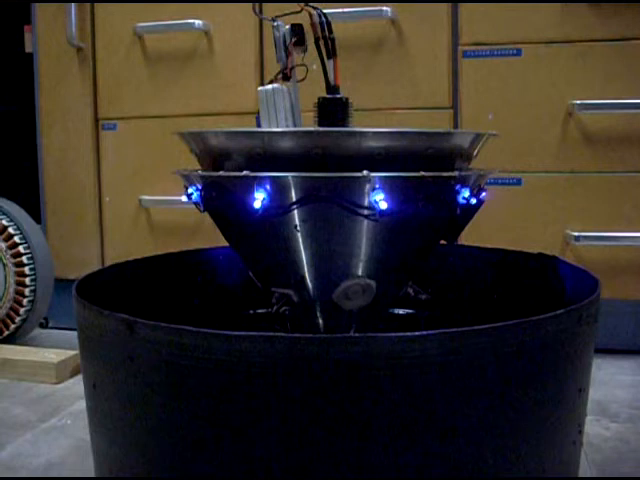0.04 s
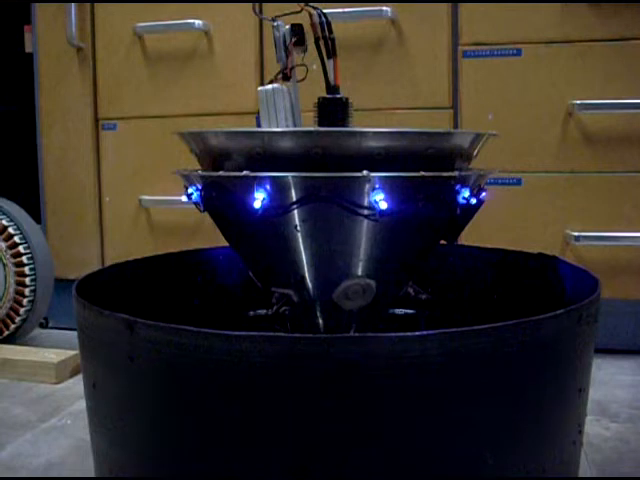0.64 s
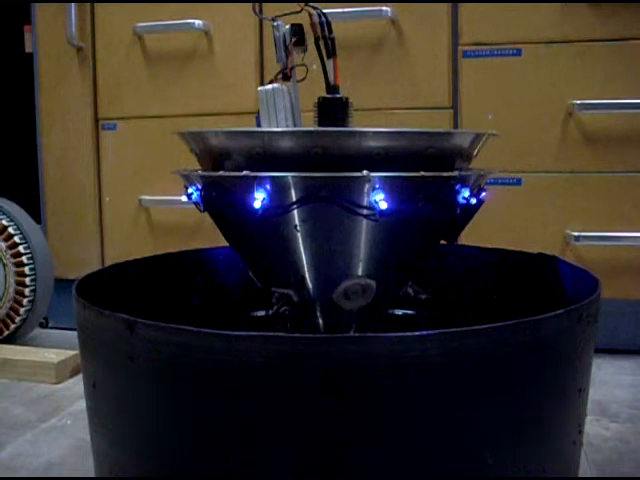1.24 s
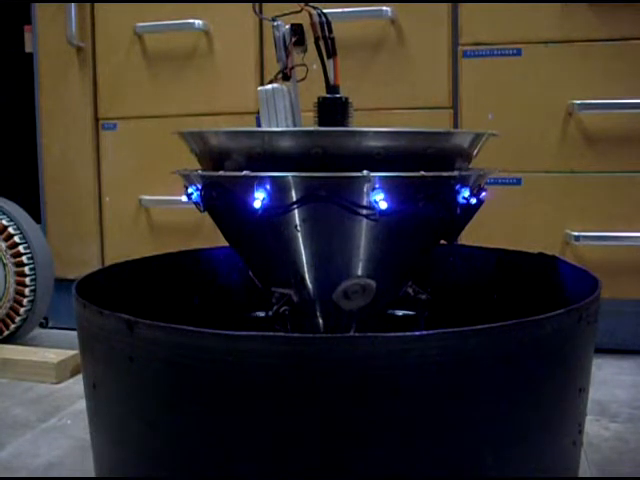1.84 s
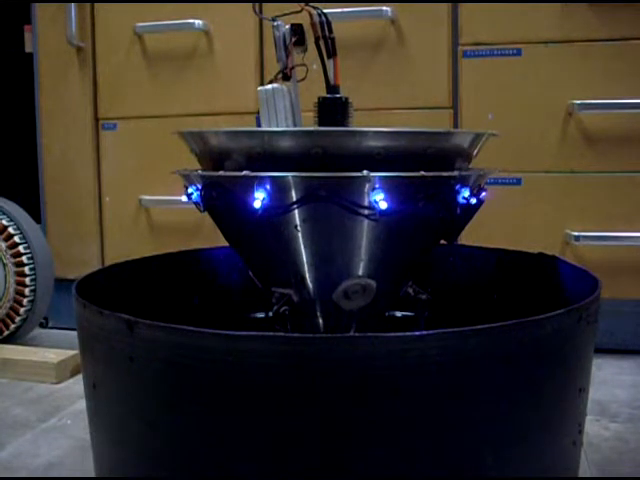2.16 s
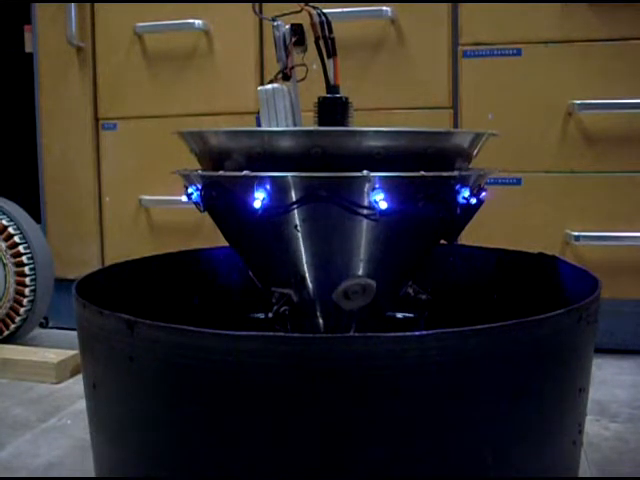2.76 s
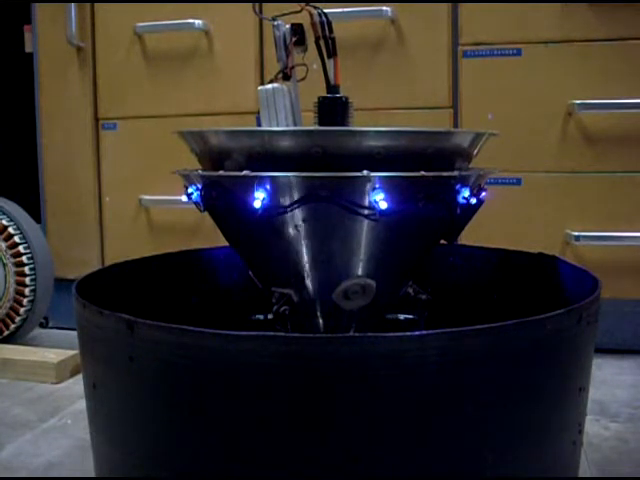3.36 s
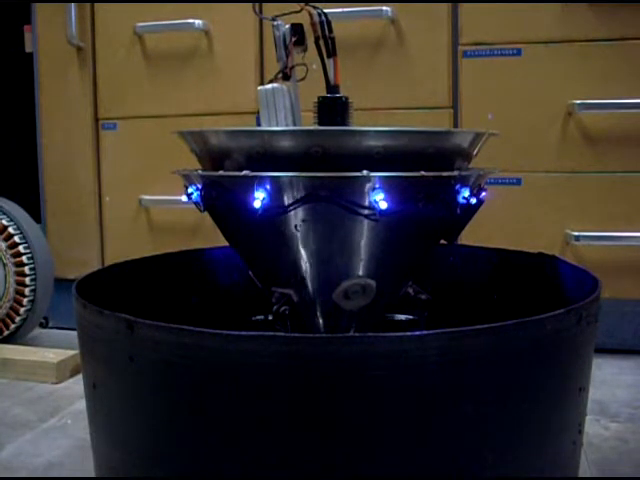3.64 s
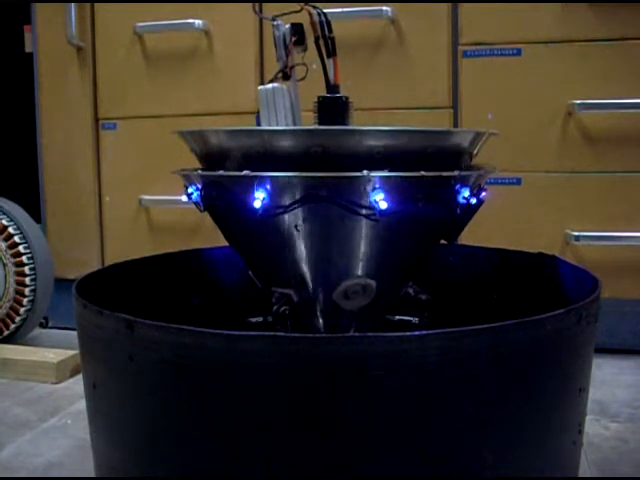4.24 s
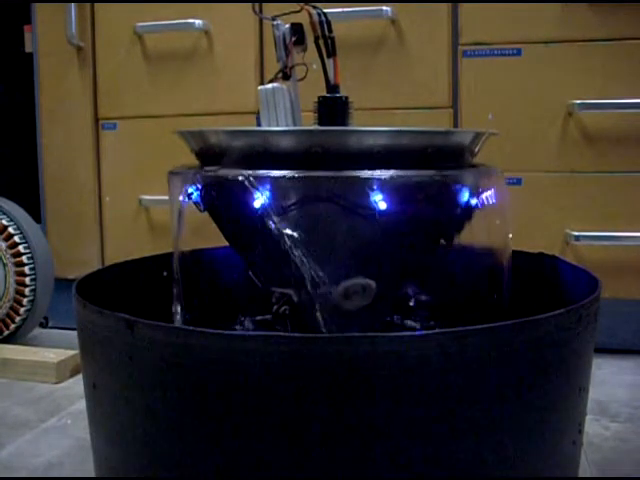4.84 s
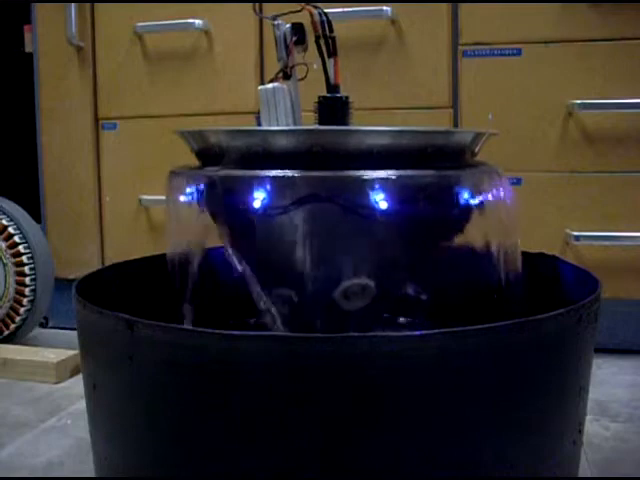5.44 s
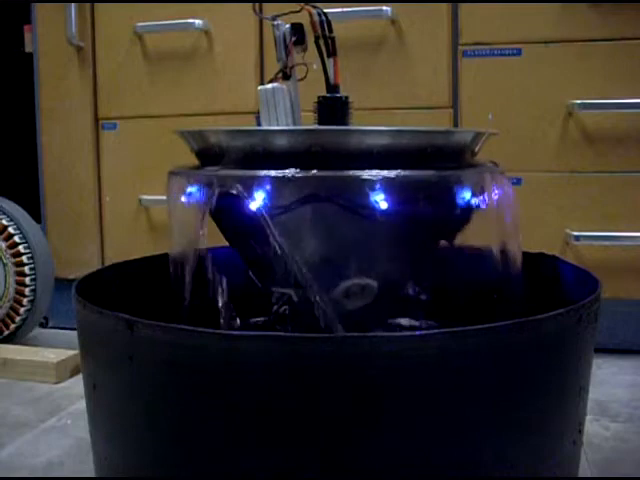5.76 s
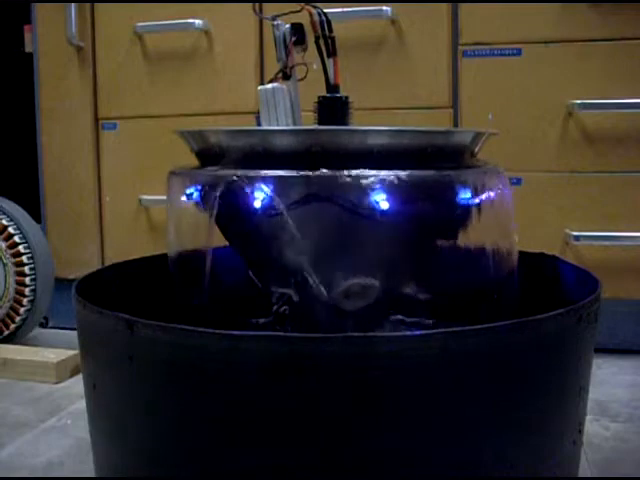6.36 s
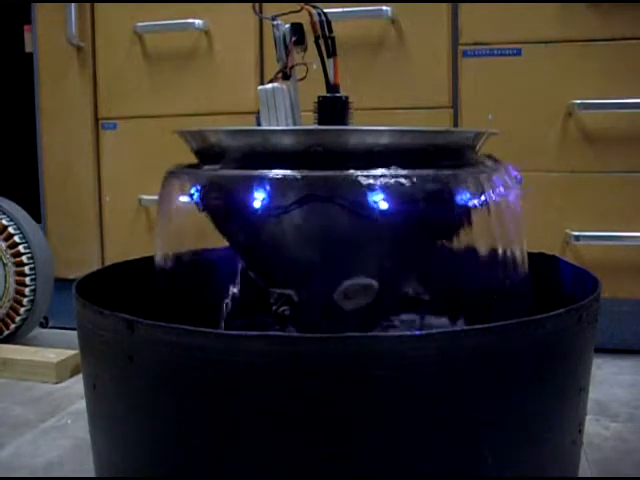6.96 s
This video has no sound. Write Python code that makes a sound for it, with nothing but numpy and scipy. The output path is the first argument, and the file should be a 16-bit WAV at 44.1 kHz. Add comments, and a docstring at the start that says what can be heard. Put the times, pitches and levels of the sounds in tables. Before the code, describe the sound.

A small electric pump speeds up with a thin, high whine. Water churns and hisses inside its metal cone, growing louder over a hollow hum. Past halfway the water spills over and splashes unevenly into a plastic tub, with gargling and a few loud gulps. Near the end the flooded pump drones in wavering tones that jump in pitch. It sounds close, with a short workshop echo.

```python
"""A cone pump overflowing in a tub

A small electric motor spins up a cone pump standing in a plastic tub, in a workshop.
Its controller whines; water churns and climbs the cone, and the air in the bowl hums ever louder.
Then the water spills over the rim and splashes into the tub while the flooded rotor drones."""
import sys
import numpy as np
from scipy import signal
from scipy.fft import rfft, irfft, next_fast_len
from scipy.io import wavfile
from scipy.ndimage import map_coordinates

SR = 44100
rng = np.random.default_rng(int(sys.argv[2]) if len(sys.argv) > 2 else 0)


def int16_out(signal):
    """Quantize to a 16-bit WAV file."""
    q = np.round(np.clip(np.atleast_2d(signal).T, -1, 1) * 32767)
    wavfile.write(sys.argv[1], SR, q.astype(np.int16))


N = 312669

# motor speed, as how often the current steps from coil to coil: time_s, rate_hz
MOTOR_SPEED = [(0, 158), (.5, 179), (1, 206), (1.5, 226.7), (2.5, 259.4), (3.1, 278), (4, 298), (4.6, 335),
               (5.5, 358), (5.9, 361), (6.1, 427), (6.35, 430), (6.7, 419), (7.09, 403)]


def amp(db):
    """Turn decibels into a gain."""
    return 10 ** (np.asarray(db) / 20)


def unit(x):
    """Scale a signal to an average (rms) level of 1."""
    return x / np.sqrt(np.mean(np.abs(x) ** 2) + 1e-20)


def along(points, hz):
    """Read between rows of (pitch_hz, value) on a musical (log) scale."""
    pitches, values = np.transpose(points)
    return np.interp(np.log(hz + 1), np.log(pitches + 1), values)


def curves(rows):
    """Turn each column after time_s into one value per sample."""
    times, *columns = np.transpose(rows)
    return [np.interp(np.arange(N) / SR, times, column) for column in columns]


def wobble(rate):
    """A smooth curve through `rate` random values a second."""
    return map_coordinates(rng.standard_normal(int(N * rate / SR) + 4), [np.arange(N) * rate / SR])


def swell(start, end, fade_s):
    """Fade from 0 toward 1 around start, and back around end."""
    t = np.arange(N) / SR
    return np.clip(np.minimum(t - start, end - t) / fade_s + .5, 0, 1)


def swells(rows, fade_s):
    """Add up one swell per row of (start_s, end_s, size)."""
    return sum(size * swell(start, end, fade_s) for start, end, size in rows)


def filtered(x, response):
    """Scale each frequency in x by response(hz)."""
    size = next_fast_len(N + SR // 2)
    return irfft(rfft(x, size) * response(np.fft.rfftfreq(size, 1 / SR)), size)[:N]


def coloured(x, spectrum):
    """Shape x by rows of (pitch_hz, level_db), then scale it to level 1."""
    return unit(filtered(x, lambda hz: amp(along(spectrum, hz))))


def turn(hz):
    """The running angle (phase) of a steady or gliding tone."""
    return 2 * np.pi / SR * (np.cumsum(hz) if np.ndim(hz) else hz * np.arange(N))


def resonance(hz, width_hz):
    """A randomly stirred tone: the wider it is, the faster it wavers and the noisier it sounds."""
    knots = signal.lfilter([1], [1, -.5], rng.standard_normal((2, 2 ** 15)))
    place = turn(np.abs(width_hz)) / np.pi
    phase = turn(hz).astype(np.float32)
    wander = np.interp(place, np.arange(knots.shape[1]), knots[0] + 1j * knots[1])
    return unit(wander.real * np.cos(phase) + wander.imag * np.sin(phase))


def bubbles(low_hz, high_hz, cycles, rise, spread_db, count):
    """A swarm of bubbles, each a short tone that rises in pitch as it dies away."""
    when, pitch, size, life = rng.random((count, 4)).T
    pitches_hz = low_hz * (high_hz / low_hz) ** pitch
    lengths = (cycles * (.5 + life) * SR / pitches_hz).astype(int) + 2
    gains = pitches_hz * amp(-spread_db * np.log(np.maximum(size, .01)))
    out = np.zeros(N + lengths.max())
    for start, length, hz, gain in zip((when * N).astype(int), lengths, pitches_hz, gains):
        age = np.arange(length)
        progress = age / length
        phase = 2 * np.pi * hz / SR * age * (1 + rise * progress / 2)
        out[start:start + length] += gain * 50 ** -progress * np.sin(phase)
    return unit(out[:N])


def workshop(x, wet_db):
    """Add the short echo of tub, cabinets and floor."""
    # time the echo takes to fall 60 dB: pitch_hz, decay_s
    decay_times = [(200, 0.28), (2000, 0.41), (10000, 0.32)]
    hz, t, noise = signal.stft(rng.standard_normal(SR // 2), SR, nperseg=256)
    decay = amp(-60 * t / along(decay_times, hz)[:, None])
    tail = signal.istft(noise * decay, SR, nperseg=256)[1]
    delayed = np.pad(x, (SR // 300, 0))
    return x + amp(wet_db) * signal.fftconvolve(delayed, tail / np.linalg.norm(tail))[:N]


def emptiness():
    """1 while the bowl is empty, 0 once it is full."""
    # water in the bowl: time_s, fraction_full
    fill = [(1.9, 0), (3.1, 1)]
    return 1 - curves(fill)[0]


def driven_db(primed_db, per_doubling_db, empty_db=0, max_doublings=np.inf):
    """A level that follows speed and filling; primed means fast enough to lift water to the rim."""
    primed_hz = 295.2
    doublings = np.minimum(np.log2(curves(MOTOR_SPEED)[0] / primed_hz), max_doublings)
    return primed_db + per_doubling_db * doublings + empty_db * emptiness()


def motor():
    """The coils sing at the controller's switching rate, with side tones that spread with speed."""
    # the switching tone: time_s, pitch_hz
    switching_pitch = [(0, 7790), (3, 7785), (5.5, 7781), (6.4, 7775), (7.09, 7778)]
    # the whine grows with the load on the motor: time_s, level_db
    whine_levels = [(0.1, -63), (1.1, -55.5), (2.4, -57), (2.6, -54.5), (2.85, -57), (3.55, -55.5),
                    (3.8, -52), (7.09, -53.5)]
    # tones beside the switching tone: offset_in_motor_rates, level_db
    side_tones = [(-2, -49), (-1, -15), (1, -14.5), (2, -25), (3, -35.5)]
    # strength of all side tones together: time_s, gain_db
    side_strength = [(0, 3), (1, -3), (2, 7.5), (2.7, 5), (3.4, 12), (4, -6), (4.6, 3), (5.8, 4.5),
                     (6.4, 3), (7.09, 2)]
    switching = turn(curves(switching_pitch)[0])
    stepping = turn(curves(MOTOR_SPEED)[0] + 1.33 * wobble(14))
    # upper and lower side tones are out of step, so both loudness and pitch ripple
    sides = sum(amp(db + 2.1 * wobble(3.04)) * np.sin(switching + k * stepping + (k > 0) * np.pi / 2)
                for k, db in side_tones)
    flutter = amp(0.68 * wobble(40))
    whine = np.sin(switching) + amp(curves(side_strength)[0]) * sides
    return np.sqrt(2) * amp(curves(whine_levels)[0] + 2.5) * flutter * whine


def cone_ringing():
    """As it speeds up, the rotor shakes one note of the metal cone after another."""
    # the cone's notes: start_s, end_s, pitch_hz, width_hz, level_db
    notes = [(0, 0.904, 2550, 72.5, -74), (.2, .8, 1600, 160.4, -68), (.25, 1.15, 1720, 69.7, -68),
             (0.794, 1.7, 1944, 130.7, -62), (.95, 2.4, 5970, 662, -69), (0.983, 1.25, 280, 25.1, -71.5),
             (1.894, 3.2, 315, 40, -67), (2.09, 2.849, 3210, 794, -55.5), (2.749, 3.747, 6740, 485.5, -61),
             (3.9, 4.02, 3455, 59.2, -55)]
    return sum(amp(db) * swell(start, end, fade_s=0.32) * resonance(hz, width)
               for start, end, hz, width, db in notes)


def rumble():
    """The room's low rumble, and the tub's own, which grows with the pump's speed."""
    # tone colour of each rumble: pitch_hz, level_db
    room_colour = [(15, -6), (45, -21), (85, 6), (105, 4.5), (140, -12), (300, 0), (1000, -19)]
    tub_colour = [(15, -16), (60, 1), (160, -5.5), (300, -3), (800, -51)]
    room = amp(-71) * coloured(rng.standard_normal(N), room_colour)
    tub = coloured(rng.standard_normal(N), tub_colour)
    return room + amp(driven_db(primed_db=-78, per_doubling_db=16.7)) * tub


def churning(mist):
    """Water churns and hisses inside the cone, growing louder until the pump is primed."""
    # tone colour of churn and hiss: pitch_hz, level_db
    churn_colour = [(100, -39), (200, -34), (290, -14.5), (400, -2), (560, 0.5), (720, -1.5), (900, -1.5),
                    (1250, 0.5), (1600, 1), (2050, -2.5), (2700, -1.5), (3300, -1), (3850, -2),
                    (4400, -9.5), (7000, -30.5)]
    hiss_colour = [(2500, -8.5), (4200, -3), (5700, 0), (7000, -2.5), (8700, -6.5), (10300, -10.5),
                   (11600, -18.5), (12200, -40), (12700, -44)]
    fine = bubbles(low_hz=353.6, high_hz=5790, cycles=12.5, rise=0.069, spread_db=1.8, count=12000)
    churn = coloured(workshop(fine, wet_db=2.5) + 1.43 * rng.standard_normal(N), churn_colour)
    hiss = coloured(.45 * np.roll(mist, SR) + rng.standard_normal(N), hiss_colour)
    churn_db = driven_db(primed_db=-43, per_doubling_db=14.9, empty_db=-5.5, max_doublings=0)
    hiss_db = driven_db(primed_db=-53.5, per_doubling_db=16.4, empty_db=-0.93, max_doublings=0)
    return amp(churn_db) * churn + amp(hiss_db) * hiss


def bowl_hum():
    """Swirling water stirs the low notes of the air in the bowl."""
    # the air's notes: pitch_hz, width_hz, full_level_db, empty_change_db, curtain_change_db
    notes = [(383.6, 24, -5, -11.5, -7.5), (463.5, 34, -0.5, -1, 0.5), (527, 45, -10, 10.5, 3.5),
             (646, 65, -19, 17, 7)]
    # moments when the bowl booms louder: start_s, end_s, extra_db
    booms = [(.73, .85, 4), (3.02, 3.25, 1.5), (4.56, 4.82, 6.5), (5.24, 5.5, 3.5), (5.56, 5.88, 6),
             (5.97, 6.03, 7)]
    empty = emptiness()
    curtain = swell(5.3, np.inf, fade_s=0.48)  # spilling streams join into a curtain around the cone
    hum = unit(sum(amp(db + empty * empty_db + curtain * curtain_db) * resonance(hz, width)
                   for hz, width, db, empty_db, curtain_db in notes))
    level_db = driven_db(primed_db=-48, per_doubling_db=18.5, empty_db=-1.7)
    choke_db = -11 * swell(6.09, np.inf, fade_s=0.3)  # water closes over the rotor
    return amp(level_db + swells(booms, fade_s=0.065) + choke_db) * hum


def air_gap():
    """The air above the rising water shrinks, so its note climbs until water fills the gap."""
    # the gap's note: time_s, pitch_hz, width_hz, level_db
    note = [(.1, 648, 130.5, -70), (1.1, 666.4, 129.7, -60), (1.7, 785.3, 109.9, -57.5),
            (2.3, 802, 280, -59), (2.6, 1128, 261.3, -59.5), (3.1, 1417, 149.8, -51.5),
            (3.5, 1606, 169.8, -51.5), (3.74, 2063, 698, -47), (3.95, 2210, 697, -59)]
    hz, width, db = curves(note)
    still_open = 1 - swell(5.24, np.inf, fade_s=0.67)
    return still_open * amp(db) * resonance(hz, width)


def rim_gargle():
    """Air escapes from under the full rim in uneven bursts."""
    # the main gargling note: time_s, pitch_hz, level_db
    main_note = [(3.9, 950, -47), (4.58, 965, -47.5), (4.8, 950, -39), (5.25, 960, -38.5),
                 (5.47, 950, -33.5), (5.98, 975, -32.5), (6.25, 1020, -36.5), (6.85, 1080, -35.5),
                 (7.09, 1030, -37)]
    # higher notes of the air at the rim: pitch_hz, width_hz, level_db
    high_notes = [(1385, 55, -54.5), (1886, 91, -58)]
    main_hz, main_db = curves(main_note)
    gargle = amp(main_db - 1.8) * resonance(main_hz, width_hz=140)
    gargle += sum(amp(db) * resonance(hz, width) for hz, width, db in high_notes)
    bursts = unit(amp(1.8 * wobble(60)))
    return swell(3.9, np.inf, fade_s=0.1) * bursts * gargle


def overflow(mist):
    """Water surges over the rim and falls into the tub as coarse splashes and fine spray."""
    # tone colour of splash and spray: pitch_hz, level_db
    splash_colour = [(100, -30), (200, -12), (280, 1.5), (380, 4.5), (480, 8), (650, -0.5), (800, 7),
                     (1450, 1.5), (1700, -2), (2000, 0), (3000, -7.5), (3800, -12), (4500, -14),
                     (7000, -19)]
    spray_colour = [(2500, -7), (4200, 1.5), (5700, -1), (7000, -5), (8700, -7.5), (10300, -12),
                    (11600, -19.5), (12200, -41), (12700, -48)]
    # surges over the rim: start_s, end_s, extra_splash_db, extra_spray_db
    surges = [(4.605, 4.68, 2, 0.5), (4.74, 4.878, 4.5, 2), (5.014, 5.14, 1, 4.5), (5.258, 5.373, 1.5, 4),
              (5.41, 5.659, 1, 3), (5.745, 5.85, 3.5, -2), (5.924, 6.007, 5, -2), (6.27, 6.69, 2.5, 2.5),
              (6.774, 6.927, -0.5, 3.5)]
    spill_s, spray_settle_s, clatter_settle_s = 4.65, 0.98, 0.76
    coarse = bubbles(low_hz=492.4, high_hz=5980, cycles=16.5, rise=0.18, spread_db=3.0, count=8000)
    splash = amp(-40) * coloured(workshop(coarse, wet_db=0) + .5 * rng.standard_normal(N), splash_colour)
    spray = amp(-54.5) * coloured(mist + 1.1 * rng.standard_normal(N), spray_colour)
    surge_db = swells([(start, end, db) for start, end, db, _ in surges], fade_s=0.087)
    spray_db = swells([(start, end, db) for start, end, _, db in surges], fade_s=0.05)
    # the first water hits a still surface: extra spray and a bright clatter, which both settle
    age_s = np.maximum(np.arange(N) / SR - spill_s, 0)
    spray_db += 10 * np.exp(-age_s / spray_settle_s)
    clatter = amp(-44) * np.exp(-age_s / clatter_settle_s) * resonance(hz=2497, width_hz=950)
    falling = amp(surge_db) * (splash + clatter) + amp(spray_db + 1.9 * wobble(45)) * spray
    return swell(spill_s, np.inf, fade_s=0.041) * falling


def drop_slaps():
    """Large drops land with a short burst of spray."""
    # single drops: start_s, level_db
    drops = [(4.6542, -29.5), (4.757, -30), (4.8256, -38), (5.0274, -36), (5.2719, -35), (5.3164, -34),
             (5.5708, -26.5), (6.1435, -38), (6.268, -41), (6.7784, -34), (6.8254, -33), (6.8545, -34)]
    # tone colour of a slap: pitch_hz, level_db
    slap_colour = [(200, -33), (1000, 6), (3000, 0), (6500, 1.5), (10500, -6.5), (12000, -15), (12800, -34)]
    decay_s = 0.039
    t, out = np.arange(SR // 10) / SR, np.zeros(N + SR)
    for start, db in drops:
        out[round(start * SR):][:len(t)] += amp(db - 1 - 60 * t / decay_s) * rng.standard_normal(len(t))
    return workshop(filtered(out[:N], lambda hz: amp(along(slap_colour, hz))), wet_db=-17)


def gulps():
    """Each gulp of air rings briefly, its pitch rising as the pocket closes."""
    # large gulps at the rim: start_s, pitch_hz, level_db
    pockets = [(5.412, 910, -26), (5.478, 915, -26), (5.506, 973, -27), (5.634, 930, -19),
               (5.832, 1016, -21), (5.884, 990, -26), (6.003, 937, -23), (6.258, 1006, -25)]
    attack_s, decay_s = .001, .045
    t, out = np.arange(SR // 10) / SR, np.zeros(N + SR)
    for start, hz, db in pockets:
        loudness = amp(db + 3 - 60 * t / decay_s) * (1 - np.exp(-t / attack_s))
        out[round(start * SR):][:len(t)] += loudness * np.sin(2 * np.pi * hz * t * (1 + 0.39 * t))
    return workshop(out[:N], wet_db=-28)


def rotor_drones():
    """The flooded rotor locks on to one wavering tone after another; the narrow ones are the purest."""
    # the rotor's tones: start_s, end_s, pitch_hz, width_hz, level_db
    tones = [(5.75, 5.92, 470, 10, -41), (6.0, 6.11, 412, 10, -39), (6.1, 6.3, 620, 45, -39),
             (6.13, 6.23, 552, 18, -36), (6.275, 6.57, 641, 11, -33.3), (6.3, 6.58, 609, 12, -36.5),
             (6.57, 6.8, 643, 10, -36), (6.3, 6.9, 550, 70, -43), (6.92, 7.2, 537, 9, -34.2),
             (6.32, 6.72, 215, 4, -63), (6.86, 7.2, 268, 10, -60), (6.78, 6.92, 1165, 22, -41)]
    out = np.zeros(N)
    for start, end, hz, width, db in tones:
        purity = np.exp(-width / 35)
        tone = np.sqrt(2 * purity) * np.sin(turn(hz)) + np.sqrt(1 - purity) * resonance(hz, width)
        out += amp(db) * swell(start, end, fade_s=0.04) * tone
    flutter = unit(1 + .42 * np.tanh(wobble(75)))  # caused by lumps of water
    return out * flutter


def scene():
    """Mix machine, water and air into one channel."""
    machine = motor() + cone_ringing() + rumble()
    droplets = bubbles(low_hz=3170, high_hz=12500, cycles=9.9, rise=0.27, spread_db=4.0, count=6000)
    mist = unit(workshop(droplets, wet_db=-2.5))
    slosh = wobble(25)
    water = amp(0.44 * slosh) * churning(mist) + amp(1.18 * slosh) * overflow(mist)
    air = bowl_hum() + air_gap() + rim_gargle()
    # the bowl's small opening lets out little below its lowest note
    air = filtered(air, lambda hz: 1 / np.sqrt(1 + (335 / (hz + 1)) ** 10))
    return (machine + water + air + drop_slaps() + gulps() + rotor_drones())[None]


def record(dry):
    """Keep the first moment silent and cut off the highest treble."""
    silent_s, top_hz = .082, 12500
    audible = np.arange(N) / SR > silent_s
    return filtered(dry[0] * audible, lambda hz: hz < top_hz)[None]


dry = scene()
out = record(dry)
int16_out(out)
```